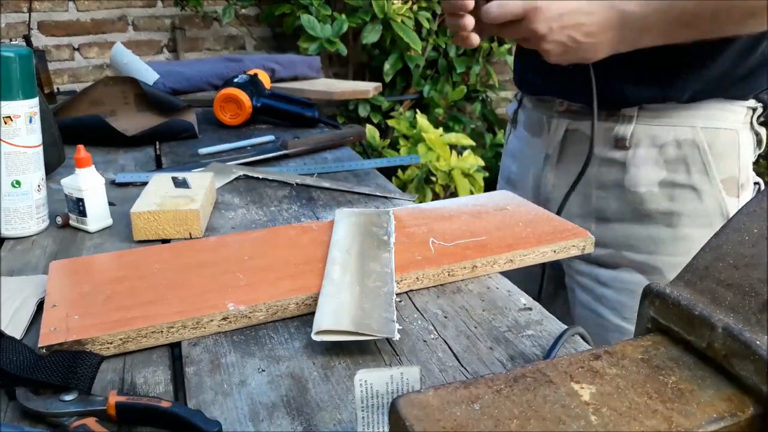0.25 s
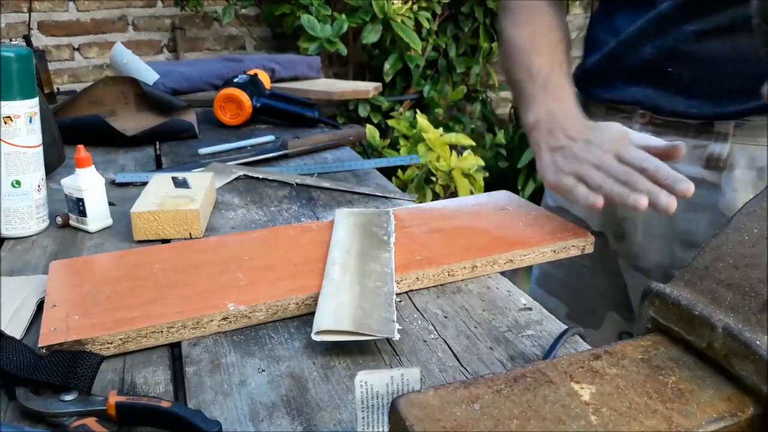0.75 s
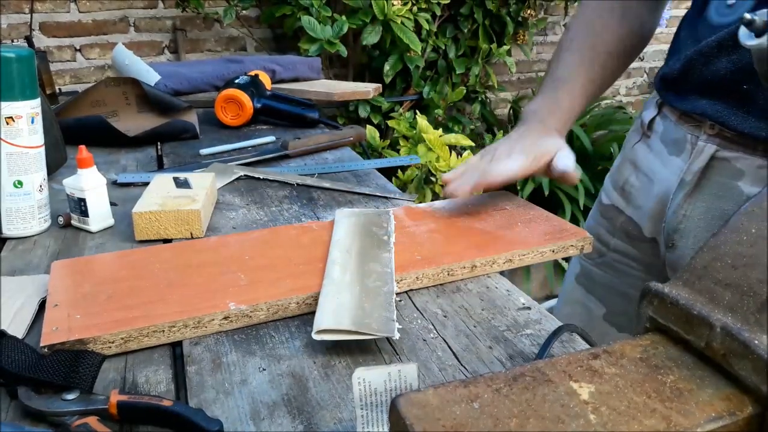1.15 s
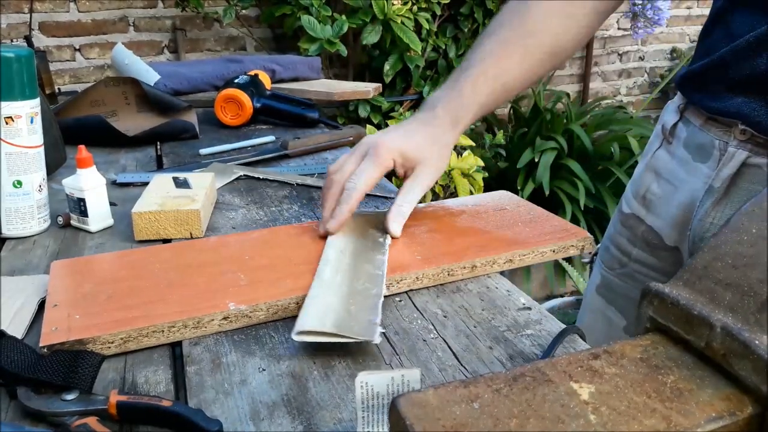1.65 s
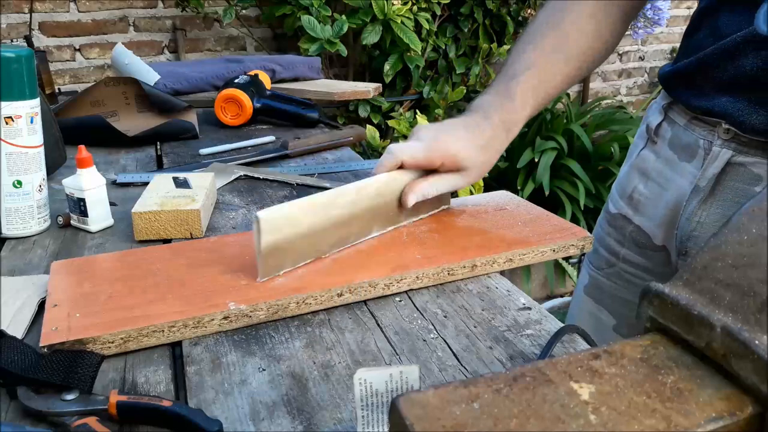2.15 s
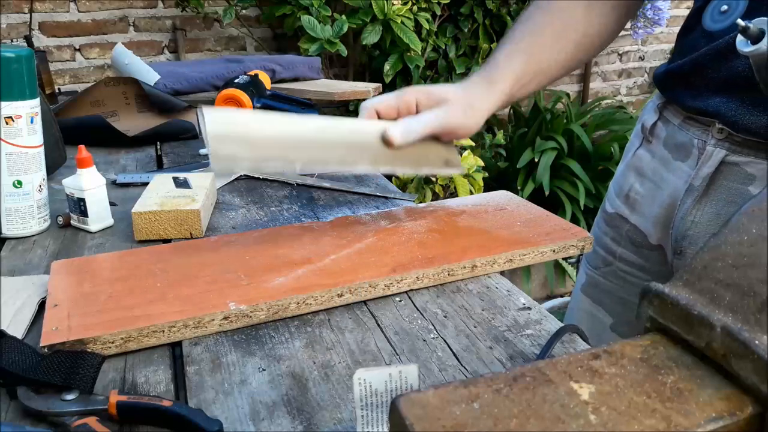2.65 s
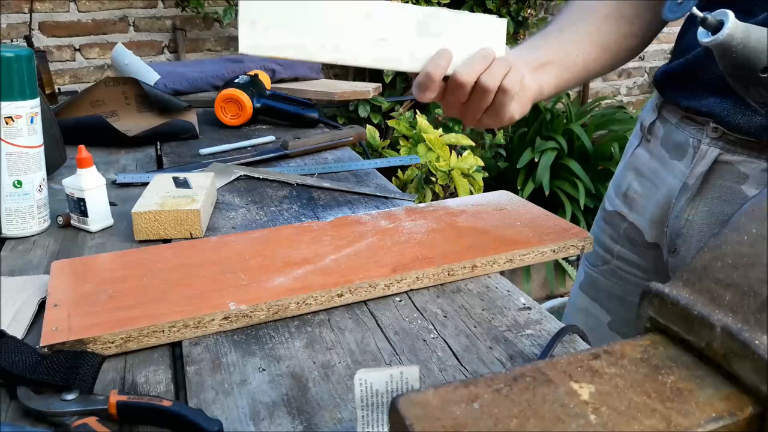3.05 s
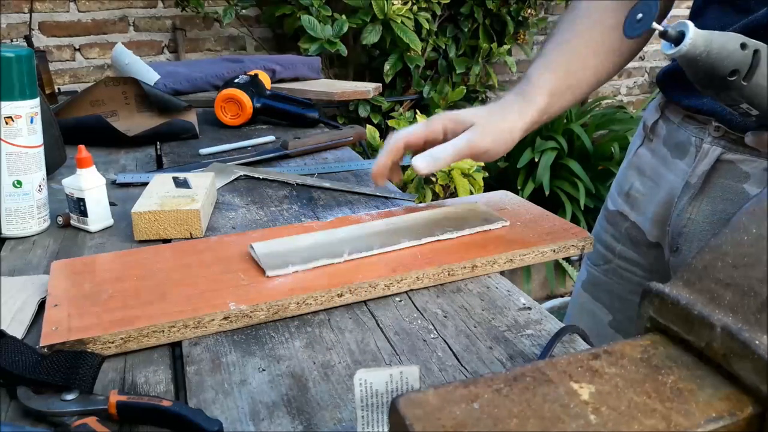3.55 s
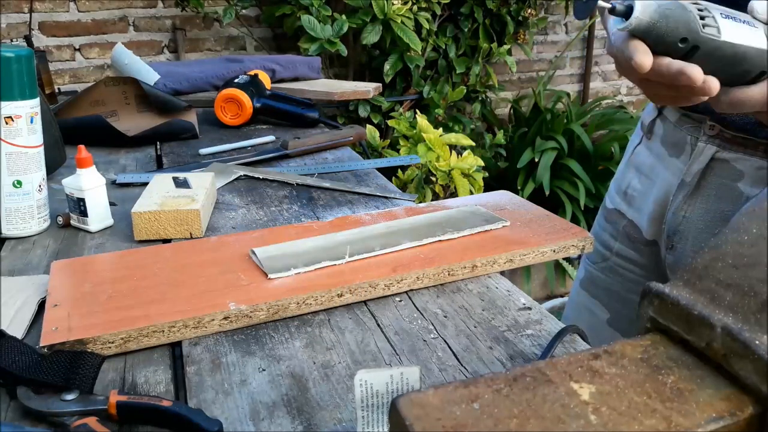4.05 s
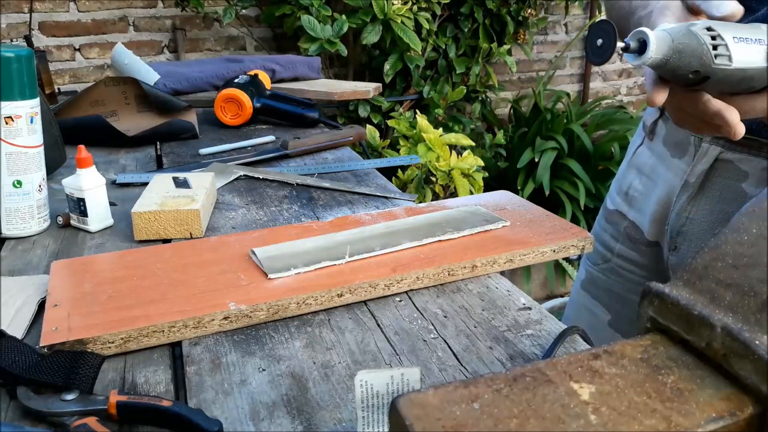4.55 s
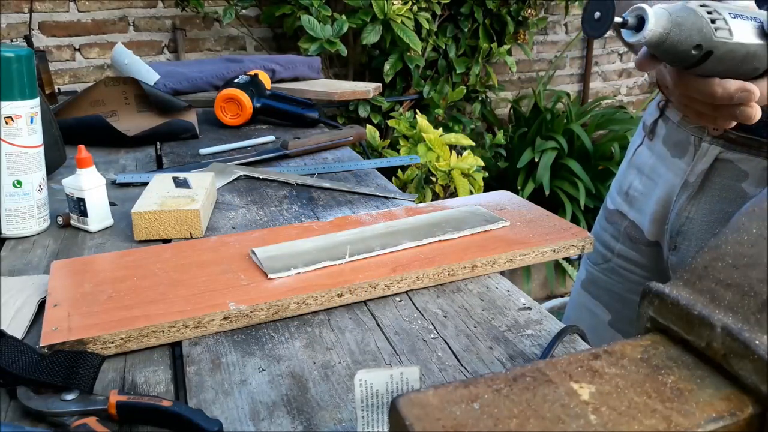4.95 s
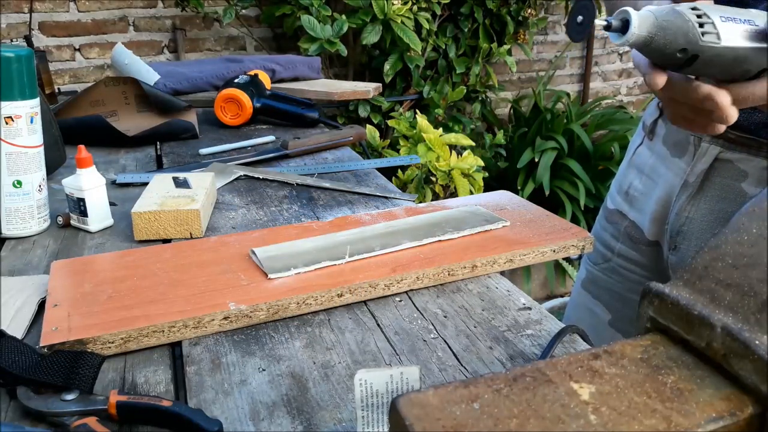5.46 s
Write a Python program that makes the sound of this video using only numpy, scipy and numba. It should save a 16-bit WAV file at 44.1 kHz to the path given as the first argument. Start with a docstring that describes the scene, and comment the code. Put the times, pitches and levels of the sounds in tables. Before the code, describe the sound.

Close to the microphone at a garden workbench, a handheld rotary tool hums, whines and hisses without cutting, its tone shifting as it is moved. After a couple of soft pats, three hard, quick knocks of plastic pipe ring through a wooden board and the bench. A lighter clack follows as the pipe is put down. The tool keeps spinning, then is switched off and begins to slow with a few tiny squeaks.

```python
"""A small rotary tool with a cutting wheel runs free over a garden workbench: its shaft hums, its
18-blade cooling fan whines, air rushes from the vents. From 2.3 s a strip of plastic pipe is knocked
three times on a loose board to shed its dust; pipe, board and bench ring and the gain control ducks.
At 3.6 s the pipe is laid down. At 5.1 s the tool is switched off and starts to wind down."""
import sys
import numpy as np
from scipy import signal
from scipy.fft import rfft, irfft, next_fast_len
from scipy.io import wavfile
from scipy.ndimage import uniform_filter1d, minimum_filter1d, map_coordinates
from numba import njit

SR = 44100
rng = np.random.default_rng(int(sys.argv[2]) if len(sys.argv) > 2 else 0)


def wav_record(signal):
    """Record a signal, one row per channel, as 16-bit PCM in the file named by sys.argv[1]."""
    frames = np.transpose(np.atleast_2d(signal))
    bounded = np.clip(frames, -1, 1)
    # unit amplitude maps onto the largest positive 16-bit level
    quanta = np.round(bounded * 32767).astype(np.int16)
    wavfile.write(sys.argv[1], SR, quanta)


N = 252247
TIME = np.arange(N) / SR
FREE_HZ, FAN_BLADES, SWITCH_OFF_S = 515.4, 18, 5.11


def motor(wander=0.000276, overtone_db=-25, hum_power=4.4, weak_power=5):
    """Tones locked to the shaft: unbalance hum, fan whine, weak motor and bearing orders."""
    # once-a-turn hum: t/s, level/dB
    hum_curve = [(0.03, -31.5), (0.34, -31), (0.62, -25.5), (0.85, -28.5), (2.2, -27.5), (3.4, -27.5),
                 (3.868, -26.5), (4.156, -33.5), (5.1, -30.5)]
    # motor and bearing tones: multiple of shaft speed, level/dB
    orders = [(1.5, -44.5), (2, -41.5), (3, -42), (4.5, -61), (7, -46.5), (8, -50), (14, -40), (16, -43)]
    speed = shaft_speed()
    angle = 2 * np.pi * np.cumsum(FREE_HZ * speed * (1 + wander * drift(9.4))) / SR
    hum = from_db(in_time(hum_curve)[0] + 0.6 * drift(27)) * speed ** hum_power * np.sin(angle)
    blade_angle = FAN_BLADES * angle + 0.055 * drift(250)   # turbulent jitter
    flutter_db = 0.57 * drift(150) + drift(14)
    blade_tone = np.sin(blade_angle) + from_db(overtone_db) * np.sin(2 * blade_angle)
    whine = whine_gain(speed) * from_db(flutter_db) * blade_tone
    weak = sum(from_db(db + 3 * drift(22)) * np.sin(k * angle + 0.21 * drift(13)) for k, db in orders)
    return np.sqrt(2) * (hum + whine + weak * speed ** weak_power)


def shaft_speed(cold_lag_hz=3.2, warm_up_s=1.3, coast_s=2.38):
    """Share of free speed: creeps up as the tool warms, decays after switch-off."""
    powered = 1 - cold_lag_hz / FREE_HZ * np.exp(-(TIME / warm_up_s) ** 2)
    return powered * np.exp(-np.maximum(TIME - SWITCH_OFF_S, 0) / coast_s)


def whine_gain(speed, coast_db=-25.5, rise_db_per_khz=6, echo_ms=4.923, echo_db=-9.5, dropout_db=-11):
    """Coasting, the blade tone sinks through an echo's notches and grows towards the housing modes."""
    # whine under power as the hand turns the tool: t/s, level/dB
    whine_curve = [(0.02, -25.5), (0.09, -24), (0.13, -26), (0.16, -19.5), (0.59, -28), (0.7, -22.5),
                   (2.2, -20.5), (3.4, -19), (3.504, -19), (3.986, -25.5), (4.058, -19.5), (4.152, -28.5),
                   (4.366, -19), (4.886, -22.5), (4.942, -35), (5.1, -35)]
    # dips as the tool is swung: t/s, length/s
    dropouts = [(.127, .012), (.32, 0.011), (.42, .02), (0.518, .015), (.58, .012), (5.17, 0.0094),
                (5.37, .016), (5.642, .009)]
    free_khz = FAN_BLADES * FREE_HZ / 1000
    notches = abs(1 + from_db(echo_db) * np.exp(2j * np.pi * free_khz * speed * echo_ms))
    coasting = notches * from_db(coast_db + rise_db_per_khz * free_khz * (1 - speed))
    powered = from_db(in_time(whine_curve)[0])
    gain = uniform_filter1d(np.where(TIME < SWITCH_OFF_S, powered, coasting), size=441)
    return gain * from_db(dropout_db * sum(swell(s, length) for s, length in dropouts))


def cooling_air(flicker_db=0.5, low_power=1.2, treble_power=2.5):
    """Fan turbulence, coloured by the housing, beamed by the vents; treble dies first as the fan slows."""
    # air rush: f/Hz, density/(dB per Hz)
    rush_spectrum = [(30, -94.5), (150, -78), (300, -76), (620, -67.5), (1000, -62), (1500, -61.5),
                     (2200, -62.5), (3500, -65), (4350, -67), (5000, -66), (5700, -66), (8600, -61.5),
                     (11400, -61), (12350, -59.5), (13300, -62), (15500, -62)]
    # housing resonances: f/Hz, width/Hz, level/dB
    housing_modes = [(1310, 39, -44), (1645, 36, -46.5), (1849, 140, -44.5), (2507, 210, -45),
                     (4913, 570, -43.5), (6690, 1200, -29), (7206, 900, -26.5), (7730, 330, -35.5)]
    # housing rush as the tool moves: t/s, level/dB
    rush_curve = [(0, -1.5), (.17, 2.5), (.33, -2.5), (1.2, -2.2), (2.2, -1.5), (3.45, -4), (4.3, 4),
                  (4.6, 1.3), (5.1, 2)]
    # treble hiss beamed forward: t/s, level/dB
    hiss_curve = [(0.02, -36), (0.15, -30.5), (0.36, -32), (0.47, -29), (1.15, -24.5), (2.16, -25.5),
                  (2.2, -25), (3.4, -26.5), (4.156, -28), (4.796, -26), (5.1, -28.5)]
    # air bands: f/Hz, share of rush swing, share of hiss swing, offset/dB
    bands = [(4550, 0.19, -0.15, 0), (5000, 1, -0.04, -.6), (7440, 0.75, 0.13, -1), (9900, 0, 0.74, -0.2),
             (13000, 0, 1, -0.9), (14500, 0.46, 0.44, -2)]
    size, speed = next_fast_len(N), shaft_speed()
    hz = np.arange(size // 2 + 1) * SR / size + 1
    points_hz, levels_db = np.transpose(rush_spectrum)
    density = from_db(np.interp(np.log(hz), np.log(points_hz), levels_db))
    rush = rfft(rng.standard_normal(size)) * np.sqrt(SR / 2) * density
    housing = rfft(sum(from_db(db) * narrow_noise(f, width) for f, width, db in housing_modes), size)
    band_index = np.interp(hz, np.transpose(bands)[0], np.arange(len(bands)))
    rush_db, hiss_db = swing(rush_curve), swing(hiss_curve)
    out = vent_flares()
    for k, (_, rush_share, hiss_share, db) in enumerate(bands):
        crossfade = np.maximum(1 - abs(band_index - k), 0)
        band = irfft((rush + housing) * crossfade, size)[:N]
        gain = from_db(db + rush_share * rush_db + hiss_share * hiss_db + flicker_db * drift(20))
        out += gain * speed ** (treble_power if k else low_power) * band
    return out + speed ** low_power * hollow_air()


def vent_flares():
    """One noise band flares as a vent sweeps past the microphone."""
    # flares: t/s, length/s, f/Hz, width/Hz, level/dB
    flares = [(.62, 0.14, 3030, 200, -38), (0.878, 0.26, 7260, 745, -23), (4.167, .05, 1300, 160, -28),
              (5.08, 0.24, 14900, 1600, -27), (5.15, 0.24, 7000, 700, -28)]
    return sum(from_db(db) * swell(s, length) * narrow_noise(hz, width)
               for s, length, hz, width, db in flares)


def hollow_air(width_hz=310, upper_ratio=2.15, upper_db=-8):
    """Two hollow noise bands that sink as the tool is lowered."""
    # lower band: t/s, f/Hz, level/dB
    hollow_curve = [(0, 2150, -30), (.11, 2150, -28.5), (.17, 1600, -32), (.48, 1450, -30.5),
                    (.62, 1380, -36), (1.1, 1164, -38), (5.1, 1190, -36)]
    hz, db = in_time(hollow_curve)
    lower = narrow_noise(hz, width_hz)
    upper = from_db(upper_db) * narrow_noise(upper_ratio * hz, width_hz)
    return from_db(db) * (lower + upper)


def squeaks():
    """Brief swelling tones of the spinning tool."""
    # squeaks: t/s, length/s, f/Hz, peak/dB
    tones = [(.15, 0.038, 4110, -30.5), (5.39, 0.011, 8020, -24), (5.585, 0.026, 6780, -26),
             (5.649, 0.0073, 6970, -12), (5.65, 0.0063, 7250, -9.5)]
    return sum(from_db(db) * swell(s, length) * np.sin(2 * np.pi * hz * TIME)
               for s, length, hz, db in tones)


def knocks(clatter_db=-5, clatter_s=0.0066, pipe_db=2, pipe_rise_s=0.001, tail_db=3):
    """The pipe's edge chatters on the board for a few ms; pipe, board and bench ring on."""
    # pipe on board: t/s, strength/dB, clack/dB, thud/dB, contact cut-off/Hz, place along pipe (0-1)
    blows = [(2.2571, 4.5, 1, 1.5, 5360, 0.22), (2.4275, 7.5, -1, 2, 4970, 0.23),
             (2.6023, 8, 0.5, -2, 5530, 0.26), (3.634, -27, 12.5, -10, 2503, 0.2),
             (3.6468, -10, 1, -16, 2410, 0.23), (3.719, -20, -5, -3, 2560, 0.28),
             (3.844, -20, -4, -10, 2495, 0.15)]
    # pipe modes: f/Hz, level/dB, t60/s
    pipe_modes = [(1276, -12, 0.028), (1664, -5.5, 0.038), (1760, -3, 0.039), (1800, -13, 0.08),
                  (2150, -14.5, 0.04), (2700, -24, .08), (2883, -13.5, 0.074), (3700, -23, 0.1),
                  (5050, -27, 0.095)]
    out, t = np.zeros(N), np.arange(SR // 2) / SR
    for s, db, clack_db, thud_db, contact_hz, place in blows:
        clatter = butter(rng.standard_normal(len(t)), [480, 5800], "band")
        clatter *= from_db(clatter_db) / clatter.std() * np.exp(-(t / clatter_s) ** 2)
        pipe = from_db(pipe_db) * struck(pipe_modes, t, place, pipe_rise_s)
        clack = clatter + pipe + from_db(tail_db) * bench_tail(t)
        knock = from_db(clack_db) * clack + from_db(thud_db) * board(t, place)
        add(out, s, from_db(db) * butter(knock, contact_hz, "low", order=4))
    return out


def pats(contact_hz=230, place=0.28, tail_db=8.5, damping_s=0.15):
    """Soft contacts reach only the lowest modes and damp them."""
    # hand and pipe on the board: t/s, strength/dB
    touches = [(.762, -14), (1.286, -7.5), (1.305, -20), (1.964, -18), (3.664, -12)]
    out, t = np.zeros(N), np.arange(SR // 2) / SR
    for s, db in touches:
        thump = butter(board(t, place) + from_db(tail_db) * bench_tail(t), contact_hz, "low", order=4)
        add(out, s, from_db(db) * thump * np.exp(-t / damping_s))
    return out


def board(t, place):
    """Thud of the loose board."""
    # board modes: f/Hz, level/dB, t60/s
    board_modes = [(152.4, -26.5, 0.19), (186, -20, 0.26), (328, -15.5, 0.22), (376, -7.5, 0.2),
                   (464, -16.5, 0.18), (532, -5.5, 0.074), (608, -21.5, 0.13), (736, -26, 0.13),
                   (966, -10, 0.037)]
    return struck(board_modes, t, place, rise_s=0.0047)


def bench_tail(t):
    """Dense modes of bench and tools, as decaying noise in half-octave bands."""
    # bench ringing: f/Hz, density/(dB per Hz), t60/s
    ringing = [(60, -69, 0.65), (251, -54, 0.25), (500, -53, 0.38), (970, -40.5, 0.074), (1750, -54, 0.39),
               (3200, -60, 0.36), (5060, -66.5, 0.49), (7000, -67, .1)]
    points_hz, levels_db, t60s = np.transpose(ringing)
    edges_hz, out = 50 * 2 ** (np.arange(16) / 2), 0
    for low, high in zip(edges_hz, edges_hz[1:]):
        db, t60 = (np.interp(np.log(low * high) / 2, np.log(points_hz), c) for c in (levels_db, t60s))
        band = butter(rng.standard_normal(len(t)), [low, high], "band")
        out += band / band.std() * np.sqrt(high - low) * from_db(db - 60 * t / t60)
    return out


def puff(start_s=2.603, length_s=0.003, drive_db=-11, band_hz=(62, 130)):
    """The last hard knock lands flat and squeezes out a dull push of air."""
    age = np.maximum(TIME - start_s, 0) / length_s
    return from_db(drive_db) * butter(age * np.exp(1 - age) + 1e-18, band_hz, "band")


def reflected(x, echo_db=-18):
    """Short echoes comb the spectrum into fine ripples."""
    # hard things on the bench: delay/ms, level/dB
    reflections = [(.58, -24.5), (0.792, -29), (1.95, -37.5), (3.0, -29.5), (3.88, -49)]
    # longer path as the tool moves: t/s, delay/ms
    echo_path = [(0, 5.1), (.4, 5.6), (1.2, 6.2), (2.1, 5.3), (3, 5), (3.9, 5.8), (5.72, 6)]
    near = sum(from_db(db) * delayed(x, ms) for ms, db in reflections)
    return x + near + from_db(echo_db) * delayed(x, in_time(echo_path)[0])


def rumble(floor_db=-60.5):
    """Faint outdoor rumble."""
    # swells: t/s, length/s, level/dB
    swells = [(1.8, .2, -55), (5.25, 0.22, -54)]
    gain = from_db(floor_db) + sum(from_db(db) * swell(s, length) for s, length, db in swells)
    return gain * narrow_noise(hz=97, width_hz=17)


def struck(modes, t, place, rise_s, depth_db=4):
    """Modes of alternating sign build up and decay; the strike place favours some."""
    out = 0
    for k, (hz, db, t60) in enumerate(modes):
        place_db = depth_db * np.cos(2 * np.pi * k * place)
        out += (-1) ** k * from_db(db + place_db - 60 * t / t60) * np.sin(2 * np.pi * hz * t)
    return (1 - np.exp(-t / rise_s)) * out


def narrow_noise(hz, width_hz):
    """Noise band, rms 1; the centre may move."""
    phase = 2 * np.pi * np.cumsum(hz * np.ones(N)) / SR
    return drift(width_hz / 2) * np.cos(phase) + drift(width_hz / 2) * np.sin(phase)


def drift(hz):
    """Low-passed noise, spread 1."""
    slow = butter(rng.standard_normal(N + SR), hz, "low")[SR:]
    return slow / slow.std()


def butter(x, hz, kind, order=2):
    """Causal Butterworth filter."""
    return signal.sosfilt(signal.butter(order, np.minimum(hz, SR * .49), kind, fs=SR, output="sos"), x)


def delayed(x, ms):
    """Steady or changing delay."""
    return map_coordinates(x, [np.arange(N) - ms * SR / 1000], order=3)


def swell(s, length_s):
    """Gaussian of height 1."""
    return np.exp(-((TIME - s) / length_s) ** 2)


def in_time(rows):
    """Each column of a curve at every sample."""
    s, *columns = np.transpose(rows)
    return [np.interp(TIME, s, c) for c in columns]


def swing(rows):
    """Level curve about its mean, in dB."""
    db, = in_time(rows)
    return db - db.mean()


def from_db(db):
    """Decibels to gain."""
    return 10 ** (np.asarray(db) / 20)


def add(out, s, sound):
    """Mix a sound in at time s."""
    start = round(s * SR)
    out[start:start + len(sound)] += sound[:N - start]


@njit
def held_cut(over_db, attack_s, hold_s, release_db_per_s):
    """Gain cut in dB: creeps up to each overload, holds, releases."""
    out, cut_db, waited_s = np.zeros(len(over_db)), 0.0, 0.0
    for i in range(len(over_db)):
        waited_s += 1 / SR
        if over_db[i] > cut_db:
            cut_db += (over_db[i] - cut_db) / (attack_s * SR)
            waited_s = 0.0
        elif waited_s > hold_s:
            cut_db = max(cut_db - release_db_per_s / SR, 0.0)
        out[i] = cut_db
    return out


def scene(wall_db=-14, wall_ms=31, wall_cutoff_hz=1000):
    """Tool and bench close by, before a garden wall; both channels alike."""
    blows = knocks() + pats()
    wall_echo = from_db(wall_db) * butter(delayed(blows, wall_ms), wall_cutoff_hz, "low")
    background = rumble()
    tool = motor() + squeaks() + reflected(cooling_air())
    return np.tile(tool + blows + puff() + wall_echo + background, (2, 1))


def record(dry, ceiling_db=-0.7, limiter_db_per_s=260, cutoff_hz=15750):
    """Slow gain control, fast look-ahead limiter, steep top cut."""
    peak = -minimum_filter1d(-abs(dry[0]), size=265)
    over_db = np.maximum(20 * np.log10(peak + 1e-9) - ceiling_db, 0)
    slow_db = held_cut(over_db, attack_s=0.026, hold_s=0.58, release_db_per_s=48)
    fast_db = np.maximum.accumulate(over_db + limiter_db_per_s * TIME) - limiter_db_per_s * TIME
    cut_db = uniform_filter1d(np.maximum(fast_db, slow_db), size=88)
    top_cut = signal.ellip(12, .1, 90, cutoff_hz, fs=SR, output="sos")
    return signal.sosfilt(top_cut, dry * from_db(-cut_db))


dry = scene()
out = record(dry)
wav_record(out)
```